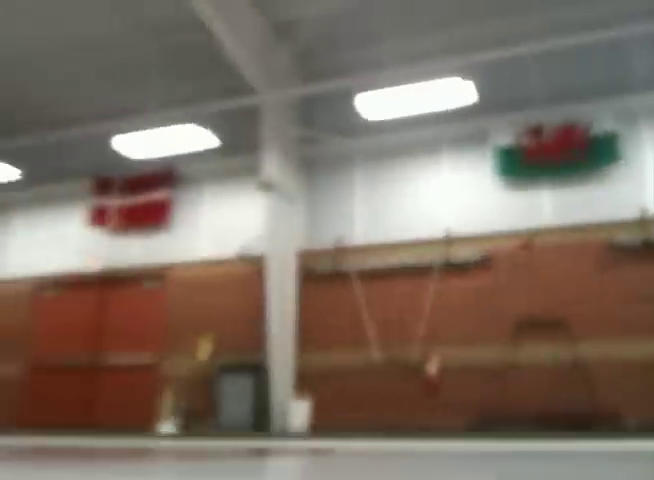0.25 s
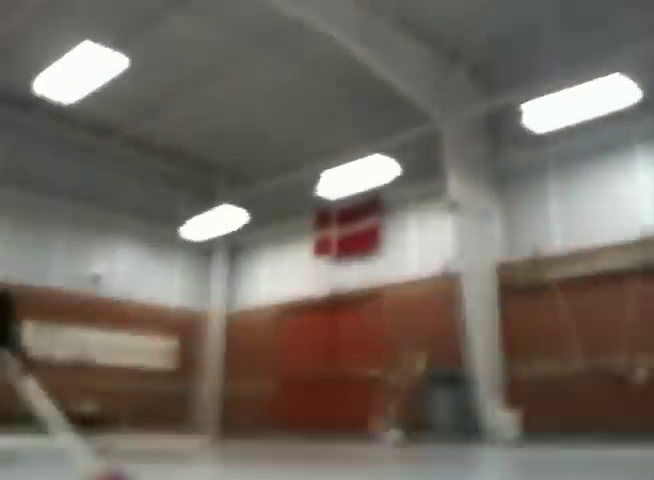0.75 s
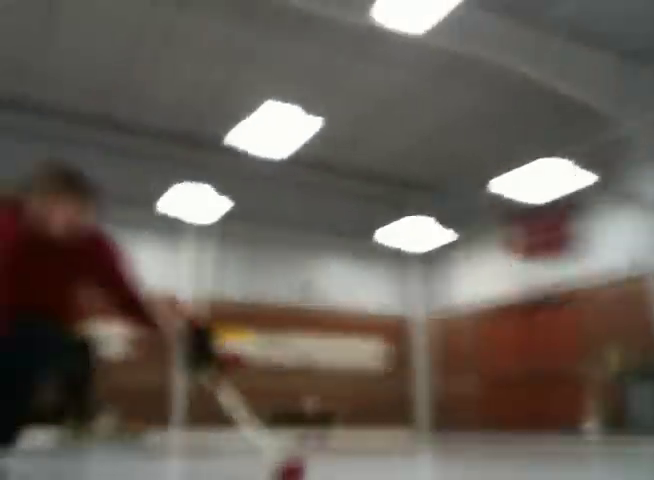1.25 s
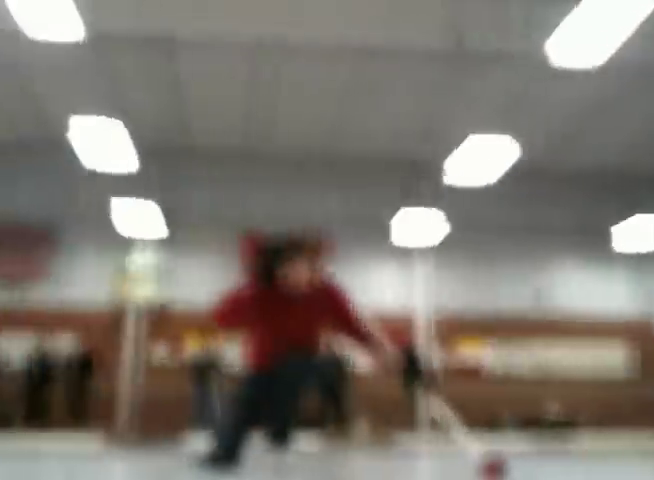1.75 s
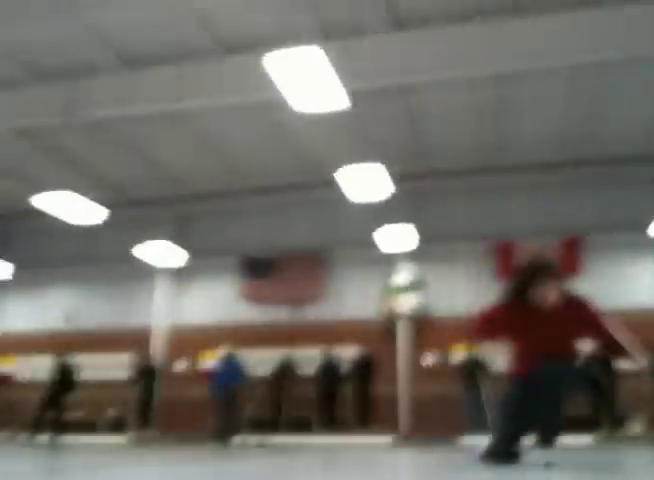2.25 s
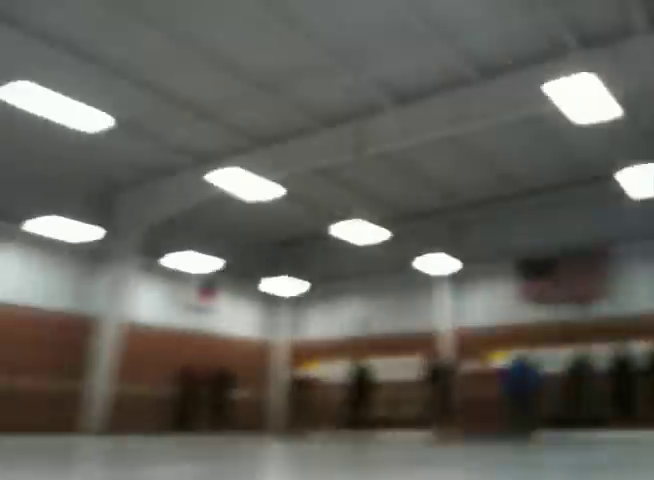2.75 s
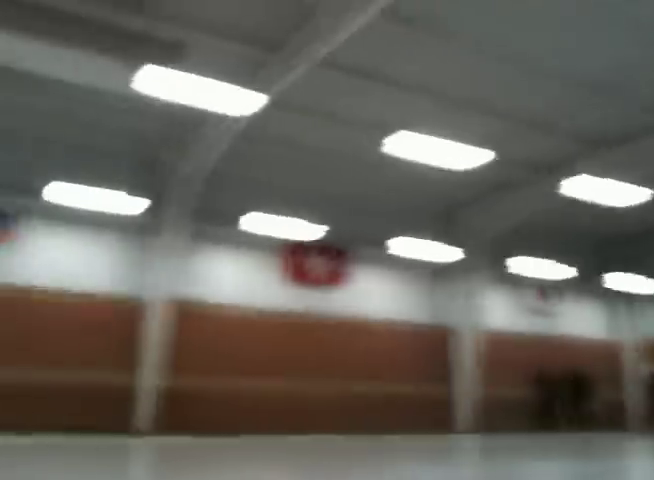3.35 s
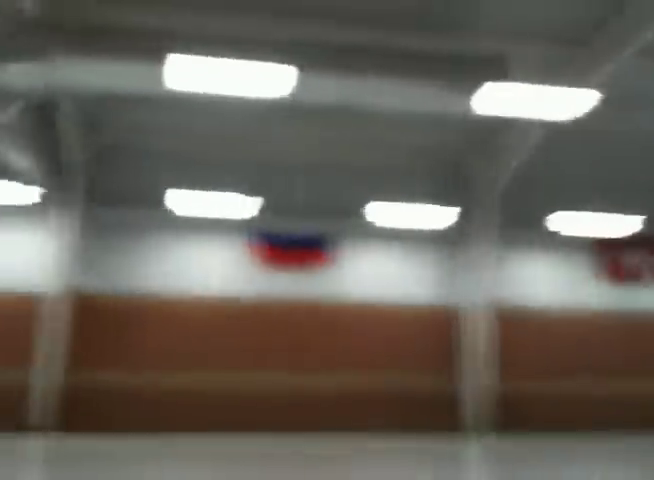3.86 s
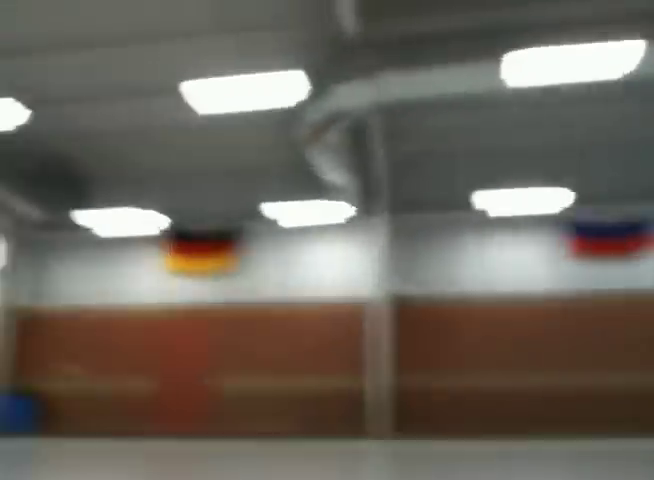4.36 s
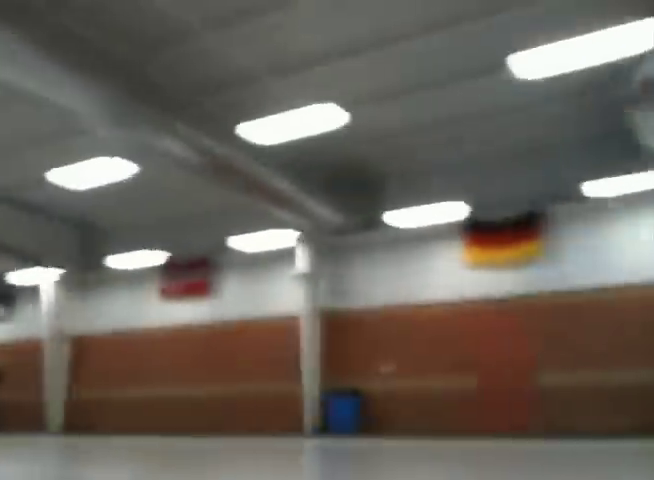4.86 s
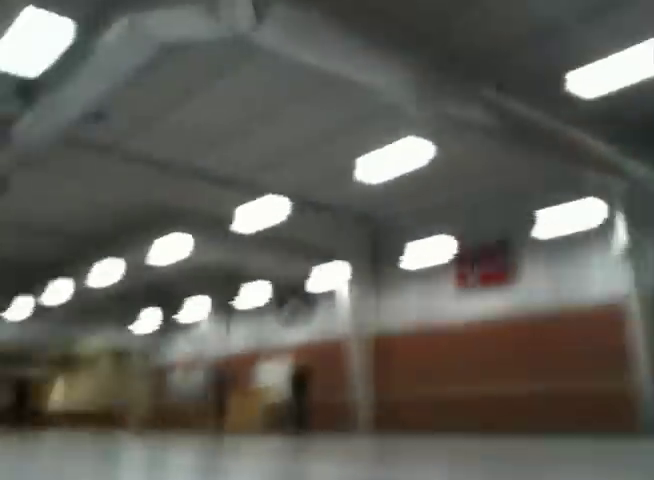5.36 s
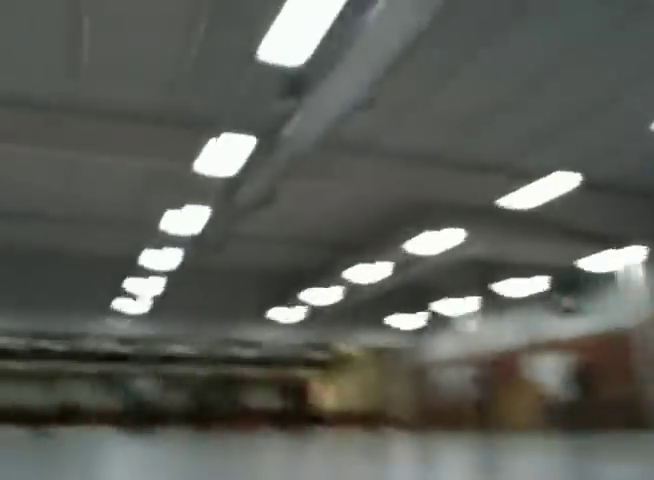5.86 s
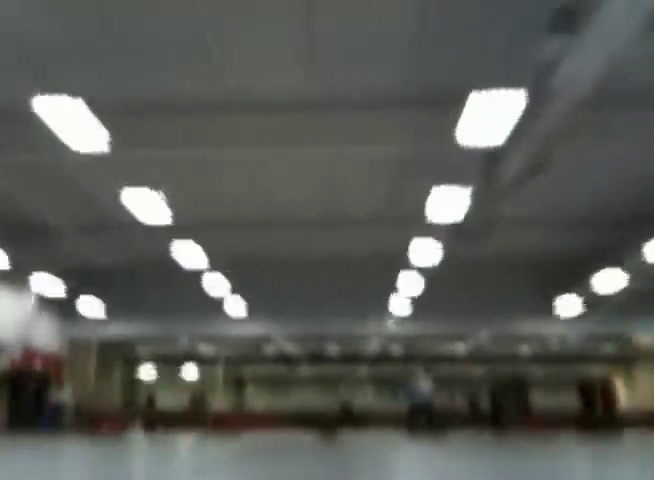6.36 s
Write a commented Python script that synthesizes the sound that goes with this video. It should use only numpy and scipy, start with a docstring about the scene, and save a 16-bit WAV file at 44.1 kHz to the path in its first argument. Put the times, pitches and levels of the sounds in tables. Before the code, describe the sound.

From the first instant, uneven low knocks rumble through a heavy stone sliding on rough ice. Over them a thin hard case chatters on its seat, each click rebounding quickly like tiny plastic taps. A faint fluttering hiss fills the gaps. The microphone rides on the stone, so everything is very close, with almost no room echo; it thins slightly later and continues to the end.

```python
"""Dull bumps and bright, bouncing ticks over a faint hiss: a granite curling stone slides on pebbled ice.
The microphone rides on the stone itself, in a small camera strapped on top.
Each ice pebble under the running band kicks the stone, which springs back and rocks for a moment.
The shaking makes the camera case chatter on its seat: each tick rebounds three times and rings the case.
Fine ice grain under the band adds a noise scrape."""
import sys
import numpy as np
from scipy import signal
from scipy.io import wavfile
from scipy.ndimage import uniform_filter1d

SR = 44100
rng = np.random.default_rng(int(sys.argv[2]) if len(sys.argv) > 2 else 0)


def wav_out(sig):
    """Save sig, one row per channel (or a flat mono array), as 16-bit PCM at SR to the path in sys.argv[1]."""
    wavfile.write(sys.argv[1], SR, np.round(np.clip(np.atleast_2d(sig).T, -1, 1) * 32767).astype(np.int16))


def magnitude_from_level(level_db):
    """Linear magnitude for a level in decibels (20 dB per decade)."""
    exponent = np.asarray(level_db, float) / 20
    return 10 ** exponent


N = 291942


def level(x, db):
    """Scale to an rms level."""
    return x * magnitude_from_level(db) / np.sqrt(np.mean(x ** 2))


def ring(x, modes):
    """Sum of resonances, each with its gain at the centre; neighbours in opposite phase."""
    out = 0
    for k, (hz, width_hz, gain_db) in enumerate(modes):
        b, a = signal.iirpeak(hz, hz / width_hz, fs=SR)
        out = out + (-1) ** k * magnitude_from_level(gain_db) * signal.lfilter(b, a, x)
    return out


def wander(per_s):
    """Random levels, per_s new ones a second, joined by straight ramps; spread a little under 1."""
    hold = int(SR / per_s)
    steps = np.repeat(rng.standard_normal(N // hold + 1), hold)
    return 0.99 * uniform_filter1d(steps, hold)[:N]


def spikes(s, size):
    """One impulse per event."""
    out = np.zeros(N)
    np.add.at(out, np.clip(np.round(s * SR).astype(int), 0, N - 1), size)
    return out


def scatter(per_s, evenness, spread_db, most_db, hard_s, clear_s):
    """Chance events of exponentially spread level, none above a ceiling or within clear_s of a hard one."""
    gap, size = rng.random((4000, 2)).T
    share = np.clip(evenness, 0, 1)
    s = np.cumsum(share - (1 - share) * np.log(1 - gap)) / per_s
    # a negative spread runs downwards from 0 dB
    db = np.minimum(-spread_db * np.log(1 - size), most_db)
    nearest_s = np.abs(s[:, None] - hard_s).min(axis=1)
    free = (s < N / SR) & (nearest_s > clear_s)
    return s[free], magnitude_from_level(db[free])


UNDER_DB = 3.5  # chance events stay this far under the median listed one


def between(table, base_db, per_s, evenness, spread_db, most_db, clear_s):
    """The listed events, and chance ones among them that follow the running level and stay under a cap."""
    hard_s, db = np.transpose(table)
    s, size = scatter(per_s, evenness, spread_db, most_db, hard_s, clear_s)
    running = magnitude_from_level(base_db[(s * SR).astype(int)])
    size = np.minimum(size * running, magnitude_from_level(np.median(db) - UNDER_DB))
    return np.append(hard_s, s), np.append(magnitude_from_level(db), size)


def push(impulses, width_s):
    """Bell-shaped contact force centred on each impulse."""
    t = np.arange(-200, 201) / SR
    return signal.fftconvolve(impulses, np.exp(-.5 * (t / width_s) ** 2), mode="same")


# stone and camera mount rocking after a bump: pitch_hz [Hz], width_hz [Hz], gain_db [dB]
ROCKING = [(197.6, 23, -5), (220.2, 6.6, 4.5), (277.3, 9.7, 2.5), (415, 20, -25), (620, 140, -58)]


def stone(force):
    """The stone springs back after each kick and rocks on, nearly a quarter cycle behind the push."""
    spring = signal.lfilter(*signal.iirpeak(220, .45, fs=SR), force)
    sway = signal.lfilter(*signal.butter(1, 70, fs=SR), force)
    return spring + magnitude_from_level(8.5) * ring(sway, ROCKING)


# firm pebbles between the hardest ones: how often, how far over the rumble, ceiling above that
FIRM_PER_S, FIRM_DB, FIRM_MOST_DB = 16, 5, 6
# the hardest pebbles passing under the band: start_s [s], level_db [dB, kick before the stone responds]
HARD_PEBBLES = [(0.0218, -17), (0.05, -8), (0.059, -11), (0.071, -6), (0.0859, -11), (0.1233, -14),
                (0.1291, -14), (0.2187, -11), (0.2594, -11), (0.2661, -10), (0.2771, -10.5), (0.4944, -8),
                (0.5031, -13), (0.511, -9), (0.5179, -6.5), (0.563, -12), (0.6337, -11.5), (0.7807, -13),
                (0.8038, -12), (0.8609, -13), (0.8834, -13), (0.8883, -10), (0.9144, -11.5), (0.9339, -15),
                (0.9722, -14), (0.9785, -12), (0.99, -13), (1.0008, -9), (1.0227, -6.5), (1.0884, -13),
                (1.2184, -10), (1.2465, -23), (1.2565, -8.5), (1.2825, -18), (1.2928, -6), (1.3796, -5.5),
                (1.4412, -9.5), (1.4461, -13), (1.4533, -7), (1.464, -10), (1.5565, -10.5), (1.5689, -8),
                (1.5909, -6), (1.5984, -12), (1.6126, -8), (1.6178, -9), (1.6488, -7), (1.6583, -1.5),
                (1.6733, -12), (1.6906, -7), (1.7249, -18), (1.7347, -9), (1.7506, -11.5), (1.8931, -10),
                (1.9149, -4), (1.9217, -17), (1.9325, -10), (2.0004, -10), (2.1827, -7.5), (2.191, -14),
                (2.1984, -11), (2.2588, -9), (2.3707, -7), (2.4504, -5.5), (2.5234, -15), (2.5405, -14),
                (2.555, -6.5), (2.5629, -7), (2.6734, -12.5), (2.6853, -15), (2.736, -7), (2.8156, -10),
                (2.8296, -3), (2.8403, -8), (2.8612, -8), (2.9583, -12), (2.9773, -8), (3.0111, -12),
                (3.0413, -14), (3.0528, -8), (3.0663, -7), (3.0776, -7), (3.0933, -13), (3.1032, -7),
                (3.1189, -7), (3.1978, -11), (3.2044, -6), (3.2712, -4), (3.2898, -6.5), (3.3338, -11),
                (3.3496, -8), (3.3621, -5), (3.3918, -11), (3.4163, -10.5), (3.4361, -12), (3.4571, -11.5),
                (3.5972, -12), (3.6196, -12), (3.6342, -5.5), (3.6597, -10), (3.6722, -13), (3.6891, -11),
                (3.6945, -10), (3.7007, -11), (3.7137, -8), (3.7739, -9), (3.7801, -9), (3.8002, -9),
                (3.83, -14), (3.8599, -10), (3.8878, -2.5), (3.9149, -9), (3.931, -10), (3.9561, -12),
                (4.0047, -11), (4.0153, -11.5), (4.0592, -12.5), (4.0984, -9), (4.1046, -13),
                (4.1426, -5.5), (4.1954, -12), (4.2021, -10), (4.2372, -9.5), (4.3054, -11), (4.3635, -13),
                (4.3771, -10), (4.3935, -10), (4.433, -10), (4.4673, -7.5), (4.4945, -10), (4.5112, -9),
                (4.5212, -5), (4.5404, -7), (4.5557, -14), (4.5615, -9), (4.5743, -9), (4.5896, -14),
                (4.6429, -7), (4.689, -12.5), (4.7774, -12), (4.7945, -10), (4.8131, -9), (4.8215, -17),
                (4.8934, -15), (4.934, -7), (5.004, -17), (5.0748, -14), (5.0812, -17), (5.1999, -17),
                (5.2164, -13.5), (5.2612, -18), (5.3496, -7), (5.4773, -13.5), (5.5111, -11), (5.599, -11),
                (5.6735, -9), (5.7496, -13), (5.8131, -18), (5.8535, -12), (5.8635, -13), (5.8705, -13),
                (5.9133, -17), (5.9268, -10), (5.9664, -18), (5.9944, -14), (6.1937, -15.5), (6.2459, -9),
                (6.2569, -9.5), (6.2835, -11), (6.3785, -9), (6.3884, -15), (6.42, -12), (6.4417, -5.5),
                (6.4534, -17), (6.4711, -11), (6.5373, -10.5), (6.557, -13)]


def bumps(rumble_db):
    """Hard pebbles are sharp kicks; the small ones lift or drop the stone and merge into a rumble."""
    hard_s, kick = between(HARD_PEBBLES, rumble_db + FIRM_DB, FIRM_PER_S,
                           evenness=.2, spread_db=-0.5, most_db=FIRM_MOST_DB, clear_s=.004)
    # the band sinks into the hollow before a pebble, then is kicked up; the spring peaks a moment later
    sink = magnitude_from_level(-11) * spikes(hard_s - .00085, kick)
    force = spikes(hard_s - .0002, kick) - sink
    hard = magnitude_from_level(7.0) * stone(push(force, 0.00025))
    s, size = scatter(per_s=330, evenness=.4, spread_db=2.5, most_db=7.0, hard_s=hard_s, clear_s=.0015)
    way = np.where(rng.random(len(s)) < .3, -1, 1)  # three in ten drop the stone
    small = level(stone(push(spikes(s, way * size), 0.00032)), -0.062)
    # two rocking notes also drone by themselves, fed by the ice grain, at a wavering level
    notes = ROCKING[1:3]
    drone = ring(ring(rng.standard_normal(N), notes), notes)
    drone = level(drone * magnitude_from_level(2.4 * wander(8.9)), -5.0)
    return hard + magnitude_from_level(rumble_db) * (small + drone)


def scrape():
    """Fine ice grain under the band: a faint fluttering hiss, a mid wash and a trace of deep rumble."""
    hiss, wash, deep = rng.standard_normal((3, N))
    deep = signal.lfilter(*signal.butter(1, 90, fs=SR), deep)
    hiss = ring(ring(hiss, LIGHT_COLOUR[2:4]), LIGHT_COLOUR[2:4])
    hiss = level(magnitude_from_level(13 * wander(70)) * hiss, -56)
    broad_walls = [(hz, 1.8 * width_hz, gain_db) for hz, width_hz, gain_db in CASE_WALLS]
    wash = magnitude_from_level(5 * wander(90)) * ring(wash, broad_walls)
    # a denser scrape at first, thinning out
    early = level(ring(rng.standard_normal(N), HARD_COLOUR[:2]), -40.5)
    early = np.exp(-np.arange(N) / SR / 0.55) * early
    return hiss + early + level(wash, -46.0) + level(deep, -56)


TILT_ABOUT_HZ, WALL_SCATTER_DB = 6300, 2.5
# thin walls of the case ringing after a tick: pitch_hz [Hz], width_hz [Hz], gain_db [dB]
CASE_WALLS = [(826, 25, 11), (1151, 77, 8), (1612, 294, 5), (1782, 52, 11.5), (1983, 91, 0),
              (2555, 114, 4.5), (2816, 150, 1), (3003, 500, -3), (3365, 224, 1.5)]
# rebounds of the case on its seat: delay_s [s], level_db [dB re first contact], scatter_db [dB],
# brighter_db [dB per octave]
CASE_REBOUNDS = [(.0014, -15, 3, 10.5), (.0024, -7.5, 1.5, -0.5), (.0077, -26, 9.5, 14)]


def rattle(s, size, colour, colour_db, crack, crack_s, walls_db):
    """Each tick rebounds; every contact is a click with a tiny noisy crack that rings the parts of the case."""
    delay_s, drop_db, scatter_db, brighter_db = np.transpose(CASE_REBOUNDS)
    late, loud = rng.standard_normal((2, len(s), len(CASE_REBOUNDS)))
    ticks_n = (len(s), 1)
    tilt = np.append(0, brighter_db) + 1.5 * rng.standard_normal(ticks_n)
    # one row per tick: first contact, then its rebounds
    s = np.column_stack([s, s[:, None] + delay_s * (1 + .06 * late)])
    size = np.column_stack([size, size[:, None] * magnitude_from_level(drop_db + scatter_db * loud)])
    out = 0
    for k, (hz, width_hz, gain_db) in enumerate(CASE_WALLS):
        # each wall is struck harder or softer from tick to tick
        strike_db = walls_db + WALL_SCATTER_DB * rng.standard_normal(ticks_n)
        struck = size * magnitude_from_level(strike_db + tilt * np.log2(hz / TILT_ABOUT_HZ) / 2)
        out = out + (-1) ** k * ring(spikes(s, struck), [(hz, width_hz, gain_db)])
    for hz, width_hz, gain_db in colour:
        # how much each part rings depends on just where the case lands
        landing_db = colour_db * rng.standard_normal(ticks_n)
        hits = spikes(s, size * magnitude_from_level(landing_db + tilt * np.log2(hz / TILT_ABOUT_HZ)))
        tail = crack * signal.lfilter([1], [1, -np.exp(-1 / (crack_s * SR))], hits)
        click = hits + tail * rng.standard_normal(N)
        # twice through the resonance: dark between the parts
        out = out + ring(ring(click, [(hz, width_hz, gain_db)]), [(hz, width_hz, 0)])
    return out


# the case hops on its seat at a fairly even beat: how often, how far over the chatter, ceiling above that
HOP_PER_S, HOP_DB, HOP_MOST_DB = 20, 23, 6
CRACK, CRACK_S = 0.06, 0.00093  # share and decay (s) of the gritty tail
# broad colour of a hard tick: pitch_hz [Hz], width_hz [Hz], gain_db [dB]
HARD_COLOUR = [(2460, 1500, -5), (4170, 1460, 1), (6277, 1620, 6), (7290, 2010, 0.5), (8840, 4000, -8.5),
               (10900, 2900, -26), (14700, 1900, -22)]
# the loudest knocks of the case on its seat: start_s [s], level_db [dB, before the case rings]
HARD_TICKS = [(0.0055, -16), (0.0244, -12), (0.039, -12), (0.0555, -17), (0.0858, -15), (0.0984, -19),
              (0.1303, -14), (0.1634, -16), (0.18, -21), (0.2188, -17), (0.2361, -12), (0.2523, -19),
              (0.2665, -16.5), (0.2831, -17), (0.2982, -19), (0.3309, -20.5), (0.3441, -19), (0.3624, -21),
              (0.3872, -19), (0.4094, -25), (0.4436, -15), (0.4642, -12.5), (0.4815, -21), (0.4971, -17),
              (0.5123, -14), (0.5398, -18), (0.5707, -15.5), (0.611, -18), (0.6487, -15.5), (0.6575, -21),
              (0.6876, -17), (0.7227, -16.5), (0.7343, -17), (0.7828, -21.5), (0.8088, -12), (0.8262, -17),
              (0.8688, -13), (0.884, -16.5), (0.9148, -17.5), (0.9338, -21), (0.9487, -18), (0.9706, -19.5),
              (0.9809, -20), (0.9953, -19), (1.0148, -15.5), (1.0254, -18), (1.0372, -15), (1.0534, -15.5),
              (1.0688, -13.5), (1.0958, -18), (1.1094, -21), (1.1581, -19), (1.2151, -22), (1.235, -18),
              (1.2466, -12), (1.2668, -9.5), (1.2845, -20), (1.3362, -18), (1.374, -15.5), (1.4116, -15.5),
              (1.4318, -22), (1.4648, -13.5), (1.4854, -18), (1.5324, -15), (1.5918, -8), (1.6185, -15),
              (1.6499, -9), (1.669, -13), (1.6915, -16), (1.7031, -14.5), (1.7162, -15), (1.7301, -16.5),
              (1.7499, -17.5), (1.7691, -13), (1.8056, -19.5), (1.869, -13), (1.886, -15), (1.9043, -13),
              (1.9222, -11.5), (1.9422, -11.5), (1.9564, -12), (1.9743, -17), (2.0449, -19), (2.1036, -26),
              (2.1392, -21), (2.1479, -19), (2.1618, -7.5), (2.186, -14), (2.2595, -19), (2.3001, -20),
              (2.3258, -15), (2.3524, -20), (2.368, -15.5), (2.3931, -21), (2.4091, -19), (2.4265, -16),
              (2.4386, -12), (2.5329, -17.5), (2.5468, -15), (2.5852, -17.5), (2.6545, -23), (2.6686, -18),
              (2.6876, -24), (2.7018, -14.5), (2.7256, -15.5), (2.7433, -12), (2.8035, -18), (2.8171, -11),
              (2.8377, -20), (2.8542, -19), (2.8738, -16.5), (2.8888, -17), (2.9581, -18), (3.0563, -23),
              (3.0729, -19.5), (3.0935, -15), (3.1121, -18), (3.1244, -17), (3.142, -16), (3.1554, -15),
              (3.1691, -17), (3.1893, -15), (3.2048, -13), (3.28, -20), (3.2945, -13.5), (3.3067, -16),
              (3.3235, -26), (3.3359, -17), (3.3761, -17), (3.3931, -26), (3.4272, -23), (3.4693, -16),
              (3.4853, -12.5), (3.5083, -13.5), (3.5224, -17), (3.5393, -20), (3.5602, -13),
              (3.5769, -15.5), (3.5873, -15.5), (3.651, -14.5), (3.6725, -17), (3.6869, -20), (3.7004, -14),
              (3.7187, -26), (3.7305, -17), (3.7444, -12.5), (3.765, -12), (3.7842, -13.5), (3.8022, -11),
              (3.8303, -15), (3.8487, -8), (3.8693, -12), (3.9154, -14), (3.9279, -21), (3.9463, -12),
              (3.9695, -13.5), (3.9883, -20), (4.0049, -8), (4.0465, -17), (4.0599, -11.5), (4.0775, -8),
              (4.0901, -22), (4.1093, -15.5), (4.1214, -19), (4.1487, -14.5), (4.1632, -15), (4.218, -16),
              (4.2382, -18.5), (4.298, -25), (4.3118, -17), (4.3398, -16.5), (4.3647, -16), (4.3843, -20),
              (4.3968, -21), (4.4597, -15), (4.4988, -19), (4.5142, -23), (4.5239, -17), (4.5344, -18),
              (4.5461, -16), (4.5738, -15), (4.5932, -11), (4.6095, -18), (4.6888, -23), (4.7034, -17),
              (4.7302, -19), (4.748, -19), (4.7784, -13.5), (4.7965, -19), (4.8354, -18), (4.9173, -17),
              (4.9306, -19), (4.9419, -20), (4.9689, -12.5), (4.9861, -17), (4.9998, -21), (5.0476, -18),
              (5.0664, -22), (5.0791, -16), (5.104, -20), (5.1181, -17), (5.133, -12.5), (5.1449, -18),
              (5.1574, -17), (5.1999, -17), (5.2171, -14.5), (5.2311, -15.5), (5.2657, -23.5),
              (5.2994, -23), (5.3239, -19), (5.3359, -16), (5.3504, -15), (5.4177, -19), (5.427, -20.5),
              (5.4401, -16.5), (5.4619, -13), (5.4773, -11.5), (5.495, -14), (5.5452, -18), (5.6001, -18),
              (5.614, -14), (5.6533, -23), (5.6774, -23), (5.7258, -26), (5.8133, -21), (5.8239, -20.5),
              (5.8339, -18.5), (5.8541, -15), (5.8987, -22), (5.9263, -13), (5.9459, -15), (5.9611, -13.5),
              (6.0338, -22), (6.0421, -19.5), (6.0634, -16.5), (6.1056, -20), (6.164, -17.5), (6.1902, -16),
              (6.2463, -21), (6.264, -20), (6.2782, -17), (6.2918, -14.5), (6.3297, -10.5), (6.35, -22),
              (6.3677, -14), (6.4019, -12.5), (6.4181, -14), (6.4311, -18), (6.4705, -10.5), (6.5192, -19),
              (6.5332, -19), (6.5572, -16), (6.5795, -14.5), (6.593, -11), (6.6119, -10.5)]


def hard_ticks(chatter_db):
    """Hard landings of the case: darker ticks, each with a thud; also returns their times."""
    hard_s, knock = between(HARD_TICKS, chatter_db + HOP_DB, HOP_PER_S,
                            evenness=0.59, spread_db=0.0, most_db=HOP_MOST_DB, clear_s=.008)
    hard = magnitude_from_level(15.5) * rattle(hard_s, knock, HARD_COLOUR, colour_db=-1.0,
                              crack=CRACK, crack_s=CRACK_S, walls_db=-3.5)
    thud = -magnitude_from_level(-4.0) * push(spikes(hard_s + 0.00094, knock), 0.00054)
    return hard, thud, hard_s


# broad colour of a light tick: pitch_hz [Hz], width_hz [Hz], gain_db [dB]
LIGHT_COLOUR = [(4400, 1760, -5.5), (6370, 1100, -4.5), (7630, 1950, -4), (9020, 1850, -10),
                (9800, 6800, -16.5), (14700, 1800, -37)]
# the clearest light contacts: start_s [s], level_db [dB over the faintest chatter tick]
CLEAR_PINGS = [(0.7944, 8), (1.0043, 9), (1.2211, 14.5), (1.5555, 12), (1.679, 4), (1.8347, 8), (2.6153, 0),
               (2.9047, 12.5), (3.032, 8), (3.2214, 11.5), (3.276, 17), (3.4552, 10), (3.6192, 13),
               (3.7615, 13), (4.1703, 8), (4.2494, 11), (4.3038, 13), (4.3825, 17), (4.4674, 5),
               (4.821, 15.5), (5.0438, 14), (5.0547, 10), (5.4002, 13), (5.5081, 10), (5.7216, 10),
               (6.208, 4), (6.4884, 15), (6.5458, 19)]


def light_ticks(hard_s, chatter_db):
    """Light contacts of the case chatter thin and bright between the hard ticks."""
    s, size = scatter(per_s=165, evenness=.6, spread_db=8.5, most_db=8.5, hard_s=hard_s + .001, clear_s=.0038)
    ping_s, ping_db = np.transpose(CLEAR_PINGS)
    s, size = np.append(s, ping_s), np.append(size, magnitude_from_level(ping_db))
    light = rattle(s, size, LIGHT_COLOUR, colour_db=3.0, crack=0.16, crack_s=0.00062, walls_db=-10.5)
    # light contacts hardly stir the middle of the range
    middle = signal.butter(2, [2600, 5400], "band", fs=SR, output="sos")
    light = light - .75 * signal.sosfiltfilt(middle, light)
    return magnitude_from_level(chatter_db) * level(light, 0.21)


# gain of the very top of the ticks, before its flicker: start_s [s], level_db [dB]
TOP_GAIN = [(0, -5), (1.15, -7), (1.25, 3), (1.35, -5), (1.85, -3), (1.95, 5), (2.05, -3), (3.7, -4.5),
            (4.05, -4), (4.5, -5), (6.1, -5.5), (6.6, 0)]


def flicker_top(x):
    """The ticks' treble above about 10.5 kHz flickers and now and then flares."""
    top = signal.sosfiltfilt(signal.butter(3, 10500, "high", fs=SR, output="sos"), x)
    gain_db = 5.9 * wander(55) + np.interp(np.arange(N) / SR, *np.transpose(TOP_GAIN))
    return x + (magnitude_from_level(gain_db) - 1) * top


def ticks(chatter_db):
    """The case knocks and chatters on its seat, the contacts ringing its walls and parts."""
    hard, thud, hard_s = hard_ticks(chatter_db)
    return flicker_top(hard + light_ticks(hard_s, chatter_db)) + thud


# the ice changes under the band in patches: how often, size of the random swing in rumble and in chatter
PATCH_PER_S, PATCH_RUMBLE_DB, PATCH_CHATTER_DB = 13, 0.5, 1.1
# the steady run over small pebbles: start_s [s], rumble_db [dB], chatter_db [dB], both before the patches
STEADY_RUN = [(0.0, -19.5, -34.5), (0.37, -24, -39.5), (0.75, -21.5, -37), (1.05, -21.5, -36.5),
              (1.38, -21.5, -37), (1.77, -21.5, -36), (2.08, -22.5, -40), (2.53, -22, -38),
              (3.13, -21, -37.5), (3.61, -22, -37.5), (3.83, -21, -37), (4.74, -23.5, -38),
              (5.48, -23, -40), (5.62, -26, -39), (5.83, -24, -43), (6.09, -23, -36), (6.45, -21.5, -37.5),
              (6.62, -24.5, -41)]


def scene():
    """Bumps and ticks shake the capsule on top of the stone; the scrape is added to them."""
    s, rumble_db, chatter_db = np.transpose(STEADY_RUN)
    t = np.arange(N) / SR
    rumble_db = np.interp(t, s, rumble_db) + PATCH_RUMBLE_DB * wander(PATCH_PER_S)
    chatter_db = np.interp(t, s, chatter_db) + PATCH_CHATTER_DB * wander(PATCH_PER_S)
    shake = bumps(rumble_db) + ticks(chatter_db)
    # the shaken capsule rounds the tallest kicks
    shake = .64 * np.tanh(shake / .64)
    # its steep bass cut, even in time, digs a small dip before and after every bump
    shake = signal.sosfiltfilt(signal.butter(2, 170, "high", fs=SR, output="sos"), shake)
    return (shake + scrape())[None]


def roll_off(x):
    """The treble ends steeply here."""
    return signal.sosfilt(signal.butter(12, 16660, fs=SR, output="sos"), x)


def record(dry):
    """The camera on the stone cuts the top steeply above 16.1 kHz."""
    mix = signal.sosfilt(signal.ellip(8, .2, 70, 16100, fs=SR, output="sos"), dry)
    return roll_off(mix)


dry = scene()
out = record(dry)
wav_out(out)
```